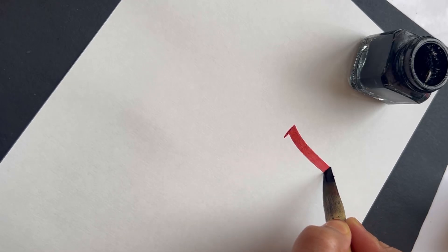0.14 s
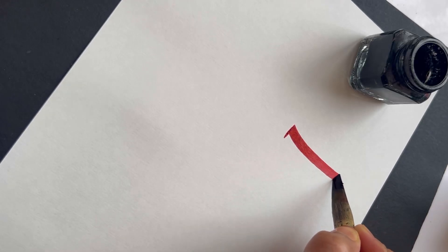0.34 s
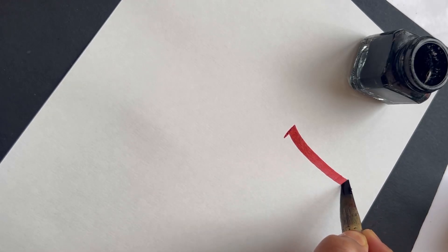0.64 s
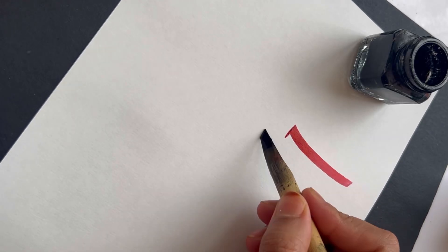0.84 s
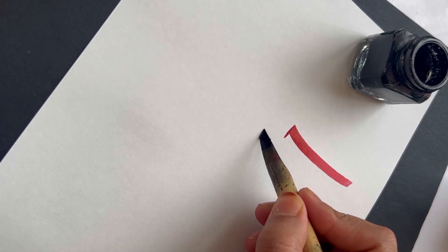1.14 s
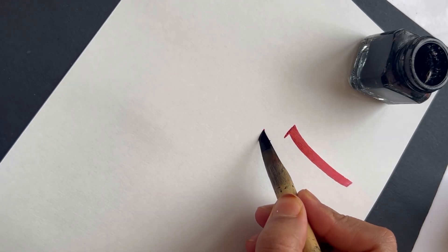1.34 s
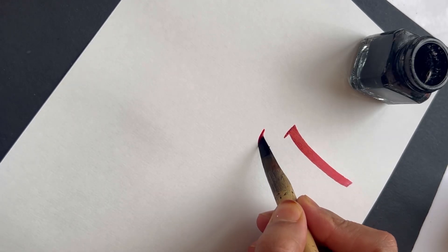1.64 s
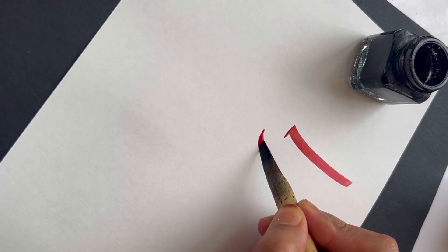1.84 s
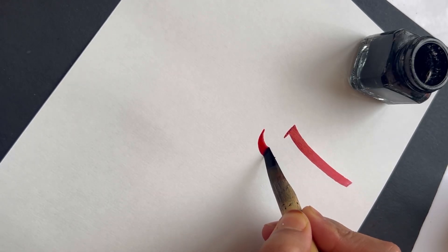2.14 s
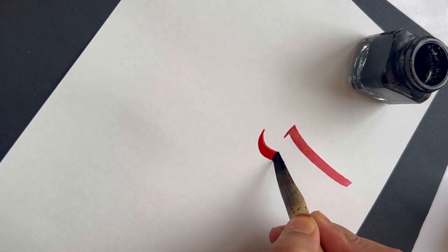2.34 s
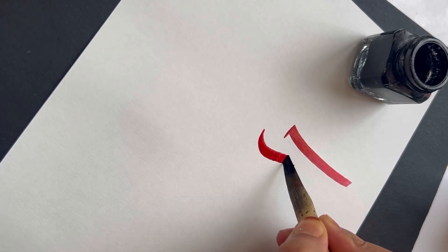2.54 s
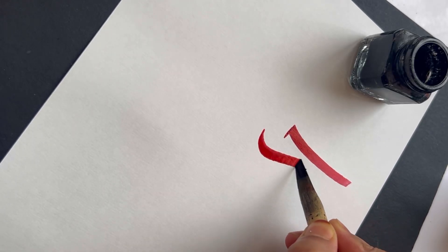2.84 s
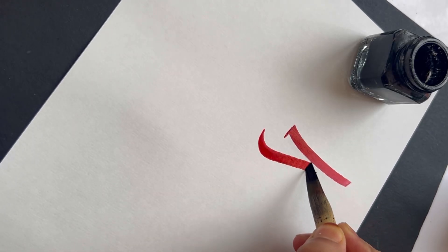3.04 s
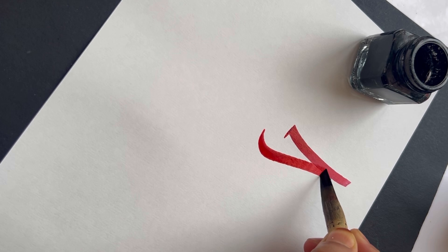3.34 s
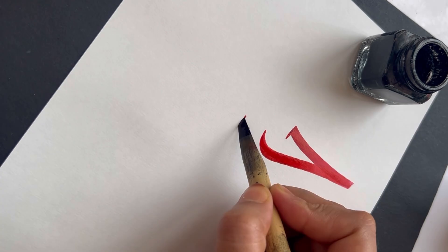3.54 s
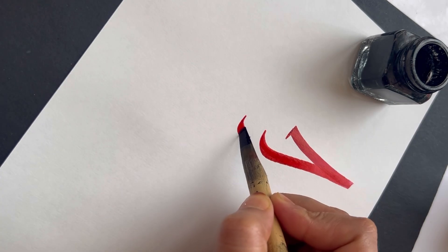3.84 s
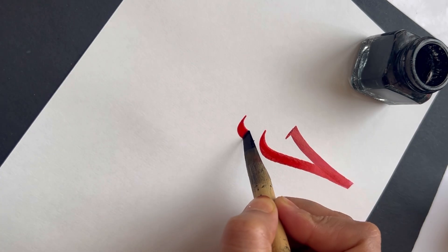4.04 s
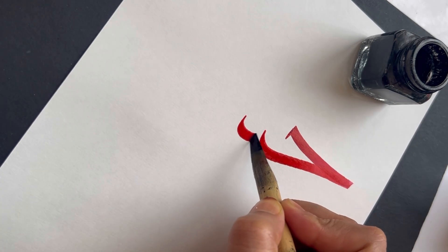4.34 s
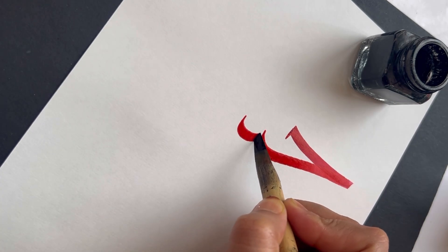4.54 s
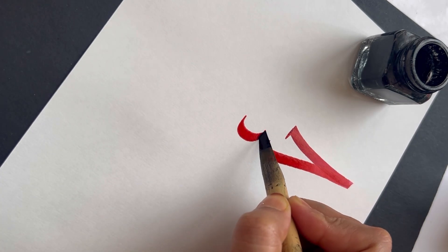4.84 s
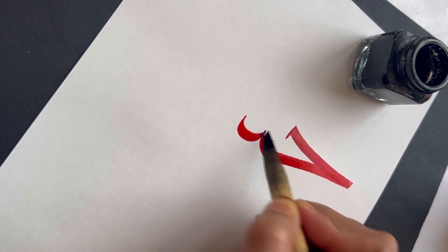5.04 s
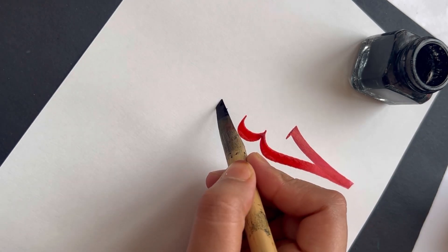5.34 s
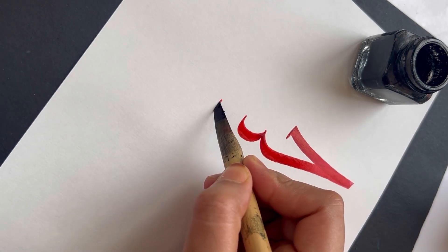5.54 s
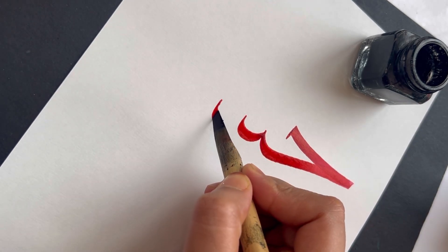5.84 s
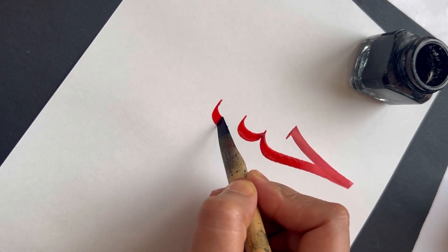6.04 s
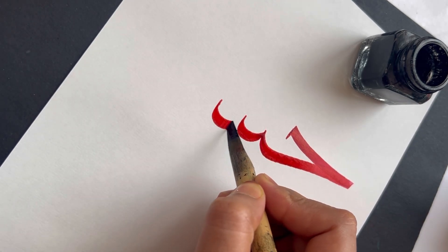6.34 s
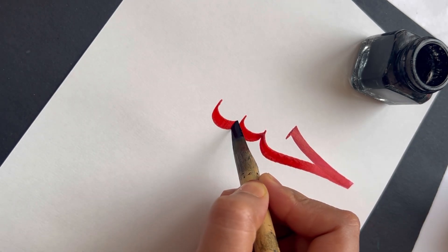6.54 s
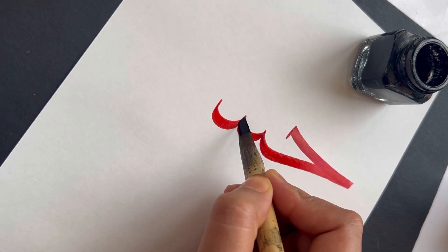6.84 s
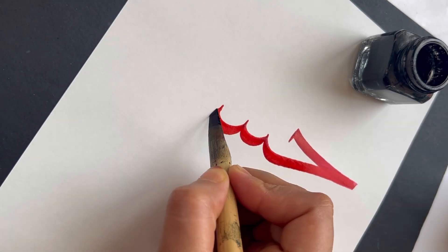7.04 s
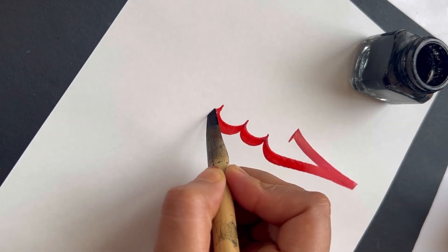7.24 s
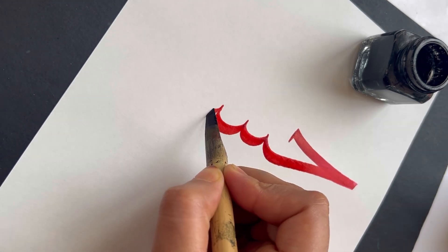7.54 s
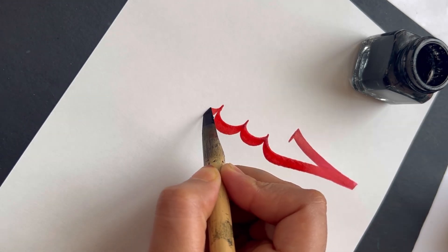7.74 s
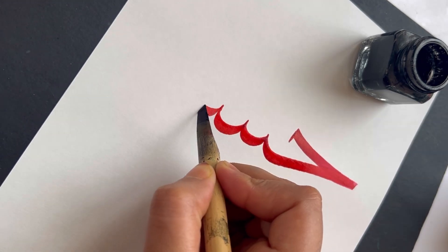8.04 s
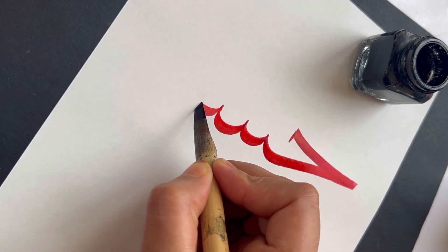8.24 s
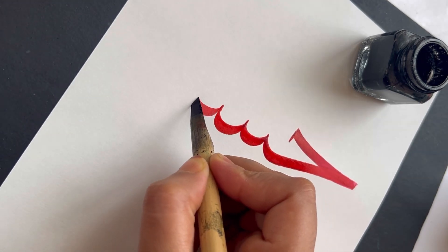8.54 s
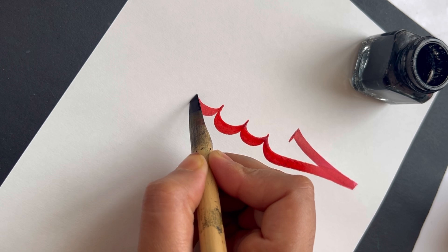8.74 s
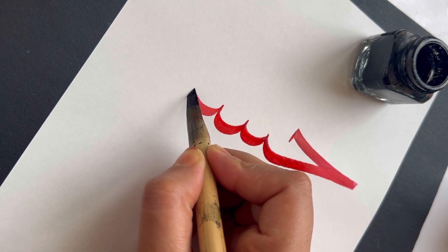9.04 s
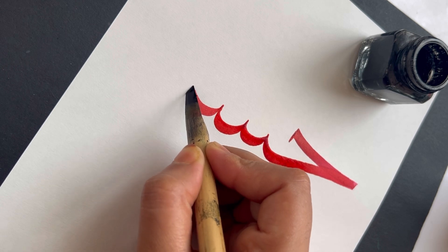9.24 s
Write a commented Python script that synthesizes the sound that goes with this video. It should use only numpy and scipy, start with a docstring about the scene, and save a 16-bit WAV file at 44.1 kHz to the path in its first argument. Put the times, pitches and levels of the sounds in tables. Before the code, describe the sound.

A bamboo pen drags across smooth paper very close by. It opens with loud, scratchy squeaks and spaced ticks, then lifts. Softer chirping ticks and faint rubbing follow in separate strokes with near-silent gaps. A brisk run of scratches comes past the middle, then denser, drier, brighter clicking to the end. A quiet room with soft ventilation hum; close stereo microphone.

```python
"""Bamboo pen on paper

A cut bamboo pen is dragged slowly over smooth paper in a quiet room with a ventilation hum.
The nib sticks and slips: each slip is a noise push through nib resonances, most add a sagging overtone
chirp, and filtered noise fades after it as a rub. Firm pressure gives trembling overtone squeals.
Two close microphone ports hear it with a phase offset; the level dips briefly a few times."""
import sys
import numpy as np
from scipy import signal
from scipy.fft import rfft, irfft, next_fast_len
from scipy.io import wavfile
from scipy.ndimage import uniform_filter1d, map_coordinates

SR = 44100
rng = np.random.default_rng(int(sys.argv[2]) if len(sys.argv) > 2 else 0)


def transcribe(signal):
    """Save signal, clipped to [-1, 1], as a 16-bit WAV file at the path in sys.argv[1]."""
    frames = np.atleast_2d(signal).T
    limited = np.clip(frames, -1, 1)
    pcm = np.round(limited * 32767).astype(np.int16)
    wavfile.write(sys.argv[1], SR, pcm)


N = 414099


def amp(db):
    """Gain of a level in dB."""
    return 10 ** (np.asarray(db) / 20)


def unit(x):
    """x at rms 1."""
    return x / np.sqrt(np.mean(x ** 2) + 1e-20)


def along(points, hz):
    """Interpolate (Hz, value) points on a log frequency axis."""
    f, v = np.transpose(points)
    return np.interp(np.log(hz + 1), np.log(f + 1), v)


def wobble(rate_hz, size=N):
    """Smooth random curve with rate_hz knots a second."""
    knots = rng.standard_normal(int(size * rate_hz / SR) + 4)
    return map_coordinates(knots, [np.arange(size) * rate_hz / SR])


def filtered(x, response):
    """x times a complex response of frequency."""
    m = next_fast_len(N + SR // 2)
    return irfft(rfft(x, m) * response(np.fft.rfftfreq(m, 1 / SR)), m)[..., :N]


def resonant(modes):
    """Causal response of parallel resonances with alternating sign."""
    def response(f):
        total = 0
        for k, (centre, width, db) in enumerate(modes):
            damping = 1j * f * width
            total = total + (-1) ** k * amp(db) * damping / (centre ** 2 - f ** 2 + damping)
        return total
    return response


def overtone_stack(hz, orders, rough_db, bright_db=0):
    """Stick-slip tone at rms 1: overtones of one pitch track, each fluttering in size."""
    phase = 2 * np.pi * np.cumsum(hz) / SR
    tone = 0
    for k, db in orders:
        level = amp(db + bright_db * k + rough_db * wobble(335, size=len(hz)))
        tone = tone + level * np.sin(k * phase + rng.uniform(0, 2 * np.pi))
    return unit(tone)


def add(track, start_s, sound):
    """Mix a sound in at start_s."""
    part = track[round(start_s * SR):][:len(sound)]
    part += sound[:len(part)]


# slips of the nib: (time [s], relative snap level [dB])
SLIPS = [(0.23, -30.5), (0.3449, -30.5), (0.4361, -25.5), (0.5362, -25.5), (0.635, -21), (2.3695, -63),
         (2.3842, -39.5), (2.4919, -38.5), (2.6088, -34.5), (2.717, -34), (2.828, -39), (2.9308, -34.5),
         (3.266, -40), (3.4512, -39), (4.087, -50.5), (4.2137, -45.5), (4.309, -38.5), (4.326, -49),
         (4.3562, -39), (4.414, -38), (4.4573, -48.5), (4.5483, -55), (4.582, -54), (4.6715, -53.5),
         (4.706, -58), (4.7962, -67), (4.8329, -69), (5.035, -71), (5.0589, -70), (5.443, -63),
         (5.478, -64), (6.2446, -33), (6.2942, -30.5), (6.35, -31), (6.397, -31.5), (6.4731, -32),
         (6.505, -34.5), (6.591, -41), (6.6228, -43.5), (6.7161, -52), (6.7425, -55.5), (6.812, -62.5),
         (6.84, -65), (6.9879, -64), (7.0675, -53), (7.1165, -55.5), (7.446, -55), (7.594, -39),
         (7.636, -38), (7.743, -32), (7.793, -33.5), (7.8645, -28.5), (7.9068, -28.5), (7.9599, -42),
         (8.0037, -30.5), (8.0487, -27), (8.0935, -30.5), (8.1392, -27.5), (8.1844, -23.5), (8.2282, -27.5),
         (8.2722, -31.5), (8.321, -36.5), (8.3621, -47), (8.39, -42), (8.4102, -40), (8.4801, -38),
         (8.504, -36.5), (8.5216, -45.5), (8.5822, -56), (8.62, -34), (8.6698, -32), (8.7185, -35),
         (8.761, -34), (8.8018, -35), (8.8437, -36), (8.8776, -53), (8.9, -51), (8.9237, -50.5),
         (8.98, -46.5), (9.0178, -34.5), (9.0513, -44.5), (9.1143, -55), (9.1566, -33), (9.199, -29),
         (9.2434, -28.5), (9.292, -25), (9.3345, -25), (9.3871, -33.5)]
# resonances of nib and sheet, drawn broad side first: (centre [Hz], width [Hz], level [dB])
BROAD_MODES = [(2242, 637, -6.5), (3760, 1800, -11), (4800, 650, -3.5), (6040, 1000, -0.5),
               (7300, 980, 1.5), (9000, 900, -4.5), (11320, 1100, -4.5), (13800, 750, -5.5)]
# the same, drawn edge first: (centre [Hz], width [Hz], level [dB])
EDGE_MODES = [(3490, 770, -9), (4700, 320, -4), (5670, 1400, -3), (7890, 800, -0.55), (10120, 1300, -6.5),
              (11300, 1800, -2.5), (13500, 2000, -6.5)]
TURN_S = 7.5  # the pen turns onto its edge
CLEAN_S = 8.26  # from here the edge lets go cleanly: shorter slides, no second knock
REGRIP_S, REGRIP_DB = .007, -11  # mean delay and strength of the second knock


def snaps():
    """The nib lets go: a sharp push and crack, then fibres tear as it slides; nib and sheet ring."""
    pushes, t = np.zeros((2, N)), np.arange(SR // 40) / SR  # rows: broad side, edge
    for s, db in SLIPS:
        crack = (t == 0) + 0.32 * amp(-60 * t / 0.0049) * rng.standard_normal(len(t))
        slide_s = rng.uniform(0.00445, 0.0081) * (.6 if s > CLEAN_S else 1)
        tearing = amp(3.9 * wobble(301.8, size=len(t))) * rng.standard_normal(len(t))
        slide = np.exp(-(t / slide_s) ** 4) * tearing
        if TURN_S < s < CLEAN_S:  # a blunter knock as the edge grips again
            dull = uniform_filter1d(rng.standard_normal(len(t)), size=5)
            knock = np.exp(-((t - .0012) / .0006) ** 2) * dull
            knock_gain = amp(db + 23 + REGRIP_DB + rng.normal(0, 3.8))
            knock_s = s + REGRIP_S * rng.uniform(.85, 1.15)
            add(pushes[1], knock_s, knock_gain * knock / np.linalg.norm(knock))
        slide_gain = 0.024 * amp(-.4 * (db + 34))  # soft slips are mostly slide
        push = crack / np.linalg.norm(crack) + slide_gain * slide
        add(pushes[int(s > TURN_S)], s, amp(db + 24) * push)
    return filtered(pushes[0], resonant(BROAD_MODES)) + filtered(pushes[1], resonant(EDGE_MODES))


# grip shared by a run of slips, levels after a middling snap:
# (start [s], chirp level [dB], rub level [dB])
GRIPS = [(0, -56, -52), (2, -45.5, -51.5), (2.77, -39, -49.5), (3.9, -50, -55.5), (4.26, -40.5, -56),
         (5.3, -43, -57.5), (6.7, -48, -58.5), (7.3, -49.5, -59), (8.07, -64, -60.5), (9.1, -74, -61)]
MIDDLING_DB = -35
CHIRP_GROWS, RUB_GROWS = 0.384, .65  # dB gained per dB of snap


def grip(s, snap_db):
    """Chirp and rub levels that follow a slip: set by the grip, growing with the snap."""
    _, chirp_db, rub_db = [row for row in GRIPS if row[0] <= s][-1]
    over_db = snap_db - MIDDLING_DB
    return chirp_db + CHIRP_GROWS * over_db, rub_db + RUB_GROWS * over_db


# chirp overtones, broad side: (multiple of pitch, relative level [dB])
CHIRP_ORDERS = [(1, 3), (2, -8), (3, -14), (4, -17), (5, -15.5)]
# chirp overtones, edge: (multiple of pitch, relative level [dB])
EDGE_ORDERS = [(1, -4.5), (2, -13), (3, 6), (4, -19), (6, -13)]
SILENT_DB = -55.5  # snaps no stronger than this have no audible chirp


def chirps():
    """The nib sings while it slides, the pitch sagging as it slows; louder chirps last longer."""
    out, t = np.zeros(N), np.arange(SR // 40) / SR
    for s, snap_db in SLIPS:
        db = grip(s, snap_db)[0] if snap_db > SILENT_DB else -120
        length_s = 0.0064 * amp(0.2 * (db + 48.0))
        shape = (1 - np.exp(-t / 0.00013)) * np.exp(-(t / length_s) ** 3)
        start_hz, orders = 2370, CHIRP_ORDERS
        if s > TURN_S:  # the edge sings lower and brighter, and flares 8 ms in
            start_hz, orders = 2080, EDGE_ORDERS
            shape = 1.8 * (shape + 0.76 * np.exp(-((t - .008) / 0.001) ** 2))
        hz = start_hz * (1 + .007 * rng.standard_normal()) * (1 - 600 * t ** 2)
        add(out, s, amp(db) * shape * overtone_stack(hz, orders, rough_db=2.5))
    return out


# fibre noise colour, for rub and squeal scratch: (frequency [Hz], level [dB per Hz])
FIBRES = [(1200, -28.5), (2200, -3.5), (3200, -10.5), (4300, -2), (5000, -5), (5900, -0.6), (7300, 0),
          (8200, -4), (9700, -8.5), (11500, -3.5), (14000, -9), (15300, -19.5), (16300, -43)]


def fibres_db(hz):
    """Spectrum of paper fibres brushing the nib."""
    return along(FIBRES, hz)


# squeals, each an arch of pitch:
# (start [s], length [s], top pitch [Hz], end pitch [Hz], nominal peak level [dB])
SQUEALS = [(0.26, 0.02, 2220, 2140, -31), (.285, 0.03, 2180, 1955, -33), (0.313, 0.0092, 2000, 1750, -41.5),
           (0.344, 0.0089, 2330, 1900, -36.5), (0.358, 0.01, 2250, 1860, -37),
           (0.375, 0.0059, 1900, 1780, -42.5), (0.439, 0.011, 2337, 2120, -40.5),
           (.447, .019, 2280, 2033, -33.5), (0.467, 0.009, 2150, 2000, -31.5),
           (0.476, 0.02, 2110, 1765, -32.5), (0.536, 0.0096, 2340, 1860, -33),
           (.55, 0.0087, 2130, 1700, -36), (0.638, 0.0093, 2380, 1810, -38.5),
           (0.644, .014, 2140, 1760, -38.5), (.665, 0.011, 2220, 1880, -37.5),
           (0.674, .013, 1840, 1780, -45.5), (3.155, 0.019, 2060, 2000, -57.5),
           (3.336, 0.029, 2090, 1880, -56.5), (4.316, 0.0172, 2286, 2000, -49.5),
           (6.251, 0.0071, 2120, 1950, -41), (6.351, 0.015, 2090, 1850, -44)]
# squeal overtones: (multiple of pitch, relative level [dB])
SQUEAL_ORDERS = [(1, -10.5), (2, -8), (3, 2.5), (4, 2.5), (5, -1.5), (6, -2.5), (7, -19.5)]
ARCH_TOP, ARCH_DROP_DB = .35, 7  # share of a squeal before its top; loss from top to end


def squeals():
    """Sustained stick-slip under firm pressure: trembling pitch, scratchy noise riding on it."""
    out, t = np.zeros(N), np.arange(SR // 20) / SR
    for s, length_s, top_hz, end_hz, db in SQUEALS:
        bend = np.clip((t / length_s - ARCH_TOP) / (1 - ARCH_TOP), -1, 1) ** 2
        tremble = 1 + 0.012 * wobble(900, size=len(t)) + .008 * wobble(150, size=len(t))
        hz = (top_hz + (end_hz - top_hz) * bend) * tremble
        edges = np.clip(np.minimum(t, length_s + 0.0011 - t) / 0.0013, 0, 1)
        level = amp(db - ARCH_DROP_DB * bend + 0.53 * wobble(230, size=len(t)))
        bright_db = 0.36 * (db + 33.0)  # softer squeals are duller
        tone = overtone_stack(hz, SQUEAL_ORDERS, rough_db=3.2, bright_db=bright_db)
        add(out, s, level * edges * tone)
    scratch = unit(filtered(rng.standard_normal(N), lambda hz: amp(fibres_db(hz))))
    envelope = np.sqrt(np.abs(uniform_filter1d(out ** 2, size=128)))
    return out + 0.17 * envelope * scratch


# glides over the fibres without snapping: (peak time [s], peak level [dB], fade [s])
GLIDES = [(.03, -62, 0.3), (.12, -58, .09), (.3, -45.5, 0.093), (.5, -47.5, .09), (.69, -55, 0.055),
          (2.055, -67, 0.04), (2.165, -67, 0.14), (2.29, -69, 0.079), (3.07, -64.5, 0.15),
          (3.19, -61.5, 0.057), (3.35, -70, 0.047), (3.49, -68.5, 0.082), (3.87, -75, 0.089),
          (3.98, -66.5, 0.053), (5.63, -75.5, 0.087), (5.86, -78.5, 0.073), (5.97, -74.5, 0.11),
          (6.04, -73, 0.066), (6.13, -64.5, .08)]
GLIDE_RISE, GLIDE_DROP_DB = 0.42, 18  # rise time over fade time; loss across a fade


def glides():
    """Level of the quiet gliding: each glide swells and fades."""
    t = np.arange(N) / SR
    level = np.zeros(N)
    for s, db, fade_s in GLIDES:
        distance = np.abs(np.maximum(t - s, (s - t) / GLIDE_RISE) / fade_s)
        level += amp(db - GLIDE_DROP_DB * distance ** 1.1)
    return level


# colour the edge adds to the rub, duller with one hollow note: (frequency [Hz], gain [dB])
EDGE_RUB = [(2000, 8), (4800, 2), (5600, 11), (6500, 3.5), (14000, -2.5)]
# the pen is off the paper, no rub: (start [s], end [s])
LIFTS = [(.738, 2), (3.526, 3.75), (5.095, 5.4)]


def rub():
    """Fibres brushing the nib: quiet glides, plus the swell that fades after the latest slip."""
    swell, t = np.zeros(N), np.arange(SR // 5) / SR
    for s, snap_db in SLIPS:
        t60_s = .3 if s > TURN_S else .22
        fade = amp(grip(s, snap_db)[1] - 60 * t / t60_s) * (1 - np.exp(-t / .008))
        start = round(s * SR)
        swell[start:][:len(t)] = fade[:N - start]  # replaces the rub of the slip before
    level = swell + glides()
    for up_s, down_s in LIFTS:
        level[round(up_s * SR):round(down_s * SR)] = 0
    grain = amp(1.7 * wobble(60) + 3.1 * wobble(500)) * rng.standard_normal(N)
    broad = filtered(grain, lambda hz: amp(fibres_db(hz)))
    edge = filtered(grain, lambda hz: amp(fibres_db(hz) + along(EDGE_RUB, hz)))
    return level * np.where(np.arange(N) > TURN_S * SR, unit(edge), unit(broad))


def sheet_echo(x):
    """A short diffuse answer of desk and hand, different at each port."""
    t = np.arange(SR // 20) / SR
    tail = rng.standard_normal((2, len(t))) * amp(-60 * t / 0.035)
    return signal.fftconvolve(x[None], tail / np.linalg.norm(tail[0]), axes=1)[:, :N]


# room tone colour: (frequency [Hz], relative level [dB per Hz])
ROOM = [(20, -40), (30, -26), (43, -10.5), (56, -5), (105, -1), (130, -8.5), (182, 1), (240, -9), (300, -6),
        (640, -9.5), (780, -21.5), (1100, -18), (2000, -25), (3000, -30), (4500, -41.5), (7500, -54.5),
        (12500, -60), (14500, -67)]
# likeness of the room tone at the two ports: (frequency [Hz], correlation [-])
ALIKE = [(60, .9995), (125, 1), (250, 0.98), (600, 0.8), (1200, 0.62), (2200, 0.93)]
# fan hum: (pitch [Hz], wander width [Hz], rms level [dB])
HUM = (75, .8, -54)
# deep tone that comes and fades: (time [s], peak level [dB])
DRONE = [(.73, -81), (.76, -60), (3.4, -68.5), (3.6, -80)]
ROOM_DB = -51.5


def room():
    """Ventilation noise partly unlike at the ports, a wavering fan hum and a deep sine."""
    def mid_side(hz):
        angle = np.arccos(np.clip(along(ALIKE, hz), -1, 1)) / 2
        return amp(along(ROOM, hz)) * [np.cos(angle), np.sin(angle)]

    mid, side = filtered(rng.standard_normal((2, N)), mid_side)
    air = unit(np.array([mid + side, mid - side])) * amp(ROOM_DB + 0.49 * wobble(1.8))
    hum_hz, width_hz, hum_db = HUM
    hum_phase = 2 * np.pi * np.cumsum(hum_hz + width_hz / 2 * wobble(3)) / SR
    hum = np.sin(hum_phase) * amp(1.5 * wobble(7.1))
    s, level_db = np.transpose(DRONE)
    t = np.arange(N) / SR
    drone = amp(np.interp(t, s, level_db)) * np.sin(2 * np.pi * 43.5 * t)
    return air + amp(hum_db) * unit(hum) + drone


def scene():
    """Pen on paper over the room tone."""
    pen = snaps() + chirps() + squeals() + rub()
    return pen + amp(-22.5) * sheet_echo(pen) + room()


# port phase: (frequency [Hz], lead of left [rad])
PORTS = [(0, 0), (780, -0.2), (1550, -0.6), (2580, 2.5), (3620, 0.97), (4910, 1.79), (7670, 5.5),
         (9730, 8.5), (10700, 10), (11900, 11.9), (13000, 13), (14500, 16.5), (16000, 16), (16600, 16.5)]
# port balance: (frequency [Hz], left minus right [dB])
TILT = [(300, 0.02), (900, 1), (1900, 2), (2600, 0.5), (4000, -0.1)]
# brief dips of level: (centre [s], half width [s], depth [dB])
DIPS = [(0.741, 0.0096, -14), (3.529, 0.012, -14), (5.1, 0.01, -13), (7.071, 0.0053, -13)]
TOP_HZ = 16900


def record(dry):
    """Port phase and balance, brief level dips, then the band limit."""
    f, lead_rad = np.transpose(PORTS)
    half = np.array([[.5], [-.5]])  # left, right

    def ports(hz):
        return amp(half * along(TILT, hz)) * np.exp(1j * half * np.interp(hz, f, lead_rad))

    def band_limit(hz):
        return amp(-12 * np.clip(hz / TOP_HZ, 0, 1) ** 24) * (hz < TOP_HZ)

    heard = filtered(dry, ports)
    t = np.arange(N) / SR
    dips_db = sum(db * np.clip(1 - np.abs(t - s) / half_s, 0, 1) for s, half_s, db in DIPS)
    return filtered(heard * amp(dips_db), band_limit)


dry = scene()
out = record(dry)
transcribe(out)
```